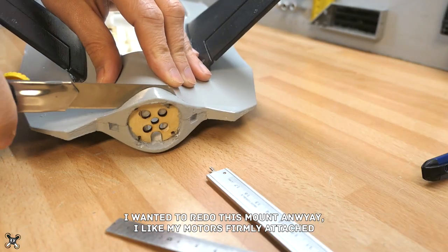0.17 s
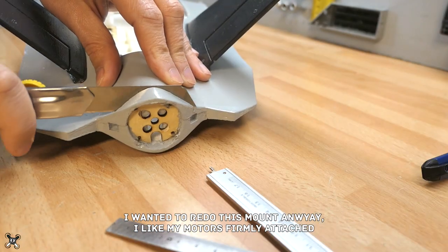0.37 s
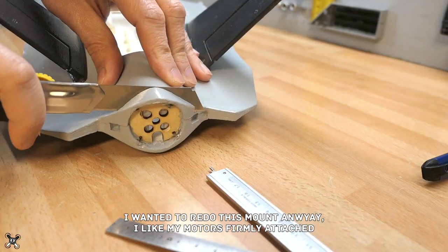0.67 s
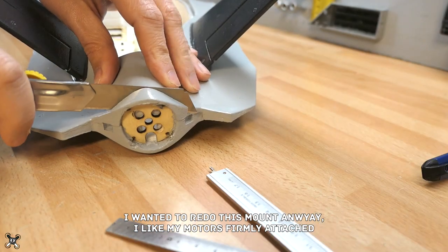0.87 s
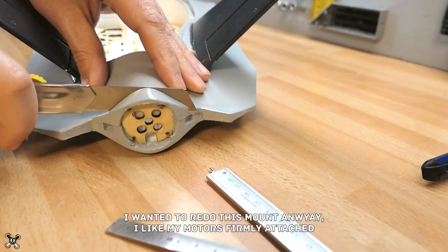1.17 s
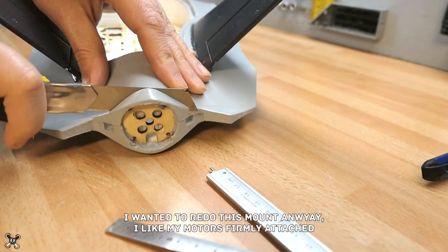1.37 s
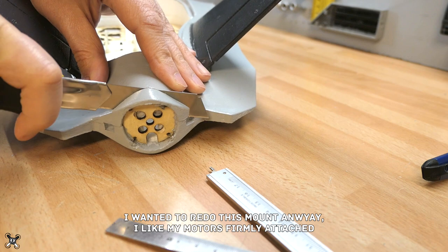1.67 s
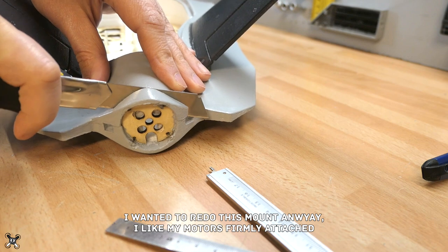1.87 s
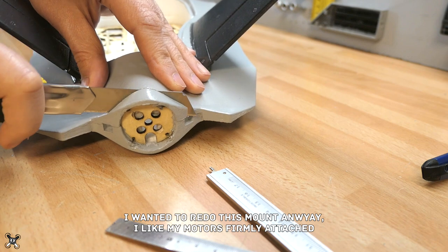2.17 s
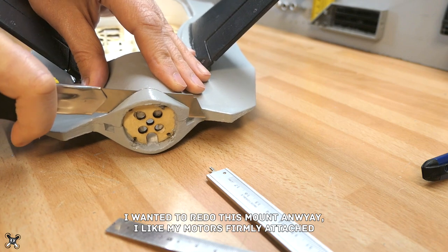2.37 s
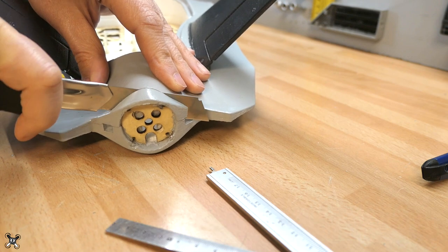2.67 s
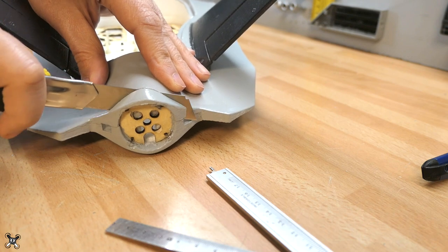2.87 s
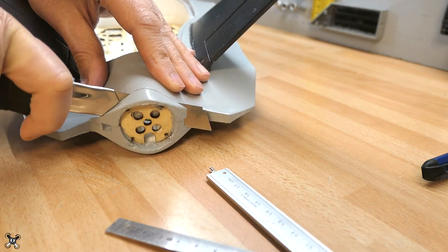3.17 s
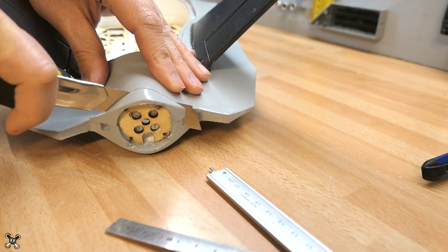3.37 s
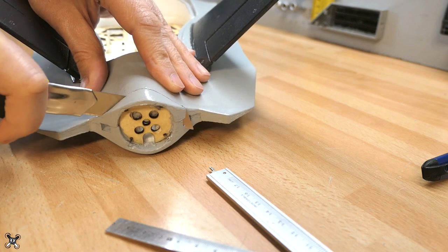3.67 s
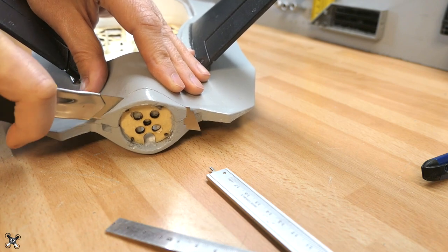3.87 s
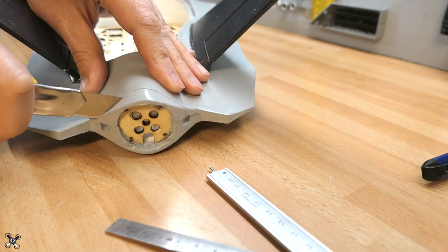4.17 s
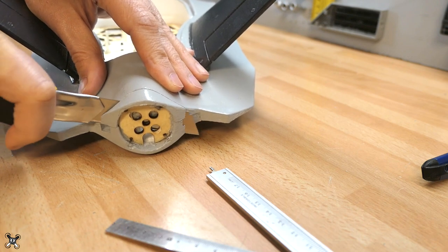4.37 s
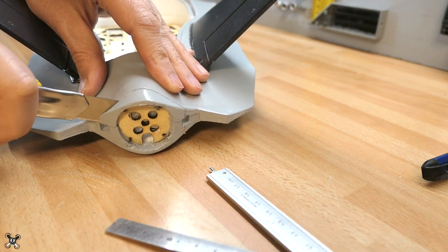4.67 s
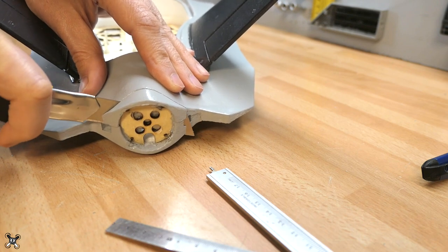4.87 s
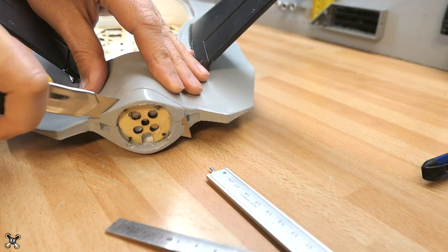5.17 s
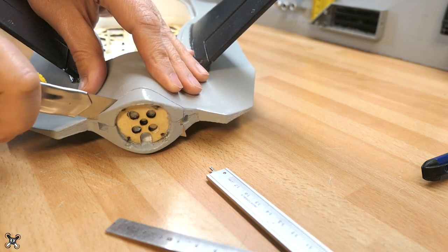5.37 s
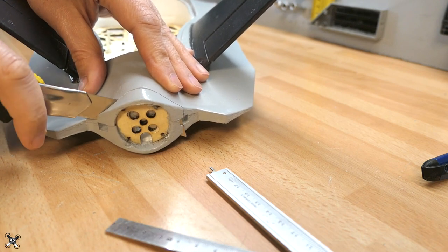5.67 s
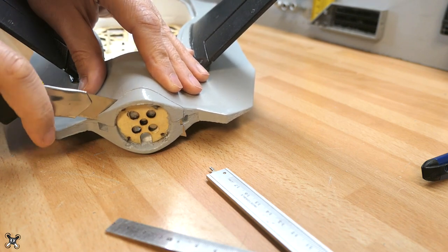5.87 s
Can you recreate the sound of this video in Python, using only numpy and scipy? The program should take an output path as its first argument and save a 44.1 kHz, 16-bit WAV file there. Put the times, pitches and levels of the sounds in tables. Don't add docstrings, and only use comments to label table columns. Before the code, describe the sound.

In a small workshop, a thin knife blade saws through a painted foam shell in short uneven strokes. Foam tears with a grainy hiss and a faint metallic ring, while the shell drags and knocks hollowly on the wooden bench. Brittle paint and glue snaps come mostly early, then stronger rasping bites after three seconds. Close stereo microphones catch short room reflections and quiet steady hiss.

```python
import sys
import numpy as np
from scipy import signal
from scipy.fft import rfft, irfft
from scipy.io import wavfile
from scipy.ndimage import uniform_filter1d

SR = 44100
rng = np.random.default_rng(int(sys.argv[2]) if len(sys.argv) > 2 else 0)


def unload_audio(sound):
    columns = np.transpose(np.atleast_2d(sound))
    steps = np.round(np.clip(columns, -1, 1) * 32767)
    wavfile.write(sys.argv[1], SR, steps.astype(np.int16))


def voltage_ratio(decibels):
    exponent = np.asarray(decibels, float) / 20
    return 10 ** exponent


N = 265482
SPLIT_HZ = 6000


def rms_one(x):
    return x / np.sqrt(np.mean(x ** 2) + 1e-20)


def butter(x, hz, kind, order):
    return signal.sosfilt(signal.butter(order, hz, kind, fs=SR, output="sos"), x)


def at_hz(points, hz):
    table = np.array([p for p in points if p[0] > 0])
    return np.interp(np.log(hz + 1), np.log(table[:, 0]), table[:, 1])


def colour(x, spectrum):
    size = 4096
    level_db = at_hz(spectrum, np.arange(size // 2 + 1) * SR / size)
    cepstrum = irfft(np.log(voltage_ratio(level_db)))
    cepstrum[1:size // 2] *= 2
    cepstrum[size // 2 + 1:] = 0
    response = irfft(np.exp(rfft(cepstrum)))
    return signal.fftconvolve(x, response)[:N]


def drift(rate_hz):
    r = np.exp(-2 * np.pi * rate_hz / SR)
    slow = signal.lfilter([1], [1, -2 * r, r * r], rng.standard_normal(N + SR))
    return rms_one(slow[SR:])


def resonate(x, peaks):
    out = 0
    for k, (hz, width_hz, level_db) in enumerate(peaks):
        r = np.exp(-np.pi * width_hz / SR)
        b = (1 - r * r) / 2 * np.array([1, 0, -1])
        a = [1, -2 * r * np.cos(2 * np.pi * hz / SR), r * r]
        out = out + (-1) ** k * voltage_ratio(level_db) * signal.lfilter(b, a, x)
    return out


def grains(per_s, spread_db, clump_db):
    sizes = voltage_ratio(spread_db * np.minimum(rng.exponential(1, N), 5)) * rng.choice([-1, 1], N)
    slips = rng.random(N) < per_s / SR
    return rms_one(sizes * slips * voltage_ratio(clump_db * drift(29.0)))


def burst(lengths_s, rise_s):
    t = np.arange(round(.04 * SR)) / SR
    shape = (1 - np.exp(-t / rise_s)) * np.exp(-t / np.clip(lengths_s, 3e-4, .012)[:, None])
    pulse = shape * rng.standard_normal((len(lengths_s), len(t)))
    return pulse / np.linalg.norm(pulse, axis=1, keepdims=True)


def place(times, pulses):
    out = np.full(N + pulses.shape[1], 1e-18)
    for s, pulse in zip(times, pulses):
        i = int(np.clip(round(s * SR), 0, N))
        out[i:i + len(pulse)] += pulse
    return out[:N]


def room_tone():
    # (frequency [Hz], density [dB per Hz])
    hiss_colour = [(15, -10), (25, -25.5), (153, -6.5), (223, -7), (476, -5.5), (659, -6.5), (714, -6),
                   (1070, -7.5), (1700, -10.5), (9840, -20.5), (14800, -32.5), (16000, -100)]
    # (frequency [Hz], difference [dB])
    side_colour = [(60, 4), (110, 5.5), (200, 14), (380, 11.5), (700, 8.5), (1290, 3), (2380, 0.5),
                   (4400, -5.5), (8120, -7), (15000, 0)]
    mid, side = (butter(colour(rng.standard_normal(N), hiss_colour), 14300, "low", order=8) for _ in range(2))
    scale = voltage_ratio(-58) / np.std(mid)
    return scale * mid, scale * colour(side, side_colour)


def snaps():
    # (time [s], peak [dB], treble lift [dB])
    snap_events = [(.002, -16, -26), (0.0411, -18, -7), (0.331, -29, -10), (0.6774, -29.5, 1),
                   (.8485, -19, -20), (0.856, -12.5, -25), (.957, -12.5, 2.5), (1.064, -34, 6),
                   (1.1357, -10, -3.5), (1.305, -26.5, -14), (1.6263, -29, 4), (2.15, -35.5, 14),
                   (2.249, -36, 10), (2.5215, -35.5, 26.5), (2.677, -27.5, -30), (2.984, -34, -5),
                   (3.093, -27, 21), (3.543, -34, 12), (3.586, -36, 12), (3.892, -25, -20),
                   (4.001, -26.5, 9), (4.375, -21.5, 4.5), (4.5176, -20.5, 16.5), (4.519, -22, 15),
                   (4.757, -20.5, 1.5), (5.1138, -23.5, -5), (5.238, -17, -3), (5.413, -33, -5),
                   (5.4872, -28.5, -1), (5.5252, -18.5, -25)]
    # (frequency [Hz], density [dB per Hz])
    crack_colour = [(880, -27), (1500, 0), (2420, -0.5), (3800, 4), (6190, -0.5), (7870, -2), (12800, -6.5),
                    (16300, -20.5)]
    crumble_s, treble_fade_s = 0.004, .0012
    s, peak_db, lift_db = np.transpose(snap_events)
    length = np.full(len(s), crumble_s)
    pulses = burst(length, rise_s=0.001)
    pulses[:, 0] = voltage_ratio(-7 + .35 * (peak_db + 22))
    strength = voltage_ratio(peak_db - 16.5) * np.sqrt(np.clip(length, 3e-4, .012) * SR)
    pulses = pulses * strength[:, None]
    fade = np.exp(-np.arange(pulses.shape[1]) / SR / treble_fade_s)
    bright_pulses = pulses * voltage_ratio(lift_db + 0.5)[:, None] * fade
    dull = butter(place(s, pulses), SPLIT_HZ, "low", order=1)
    sharp = butter(place(s, bright_pulses), SPLIT_HZ, "high", order=1)
    click = np.eye(1, N)[0]
    return colour(dull + sharp, crack_colour) / np.linalg.norm(colour(click, crack_colour))


def effort(per_bite, swell_share, edge=1):
    # (start [s], length [s], tearing [dB], swell over the stroke [dB], bite [dB])
    eased = [(.132, 0.13, -47, 7, -6), (.314, 0.13, -48, 8, 2.5), (.448, .183, -55.5, -4, -5.5),
             (.703, 0.15, -45.5, -1.5, -4), (1.442, 0.27, -57.5, -24, -7), (1.575, .13, -51.5, 20, -3),
             (1.94, 0.13, -47.5, -5.5, 3.5), (2.129, .06, -53.5, 6, -1.5), (2.257, 0.29, -54, -18.5, -0.5),
             (2.429, 0.084, -48, 17.5, 0), (2.65, 0.2, -50, 11, 1), (2.957, 0.022, -48.5, 7, 3.5),
             (3.318, 0.18, -47, 4, 7.5), (3.546, 0.12, -51.5, -13, 3), (3.615, 0.18, -42, 5.5, 3),
             (4.21, 0.22, -43.5, 0, 4.5), (4.688, 0.25, -49.5, -6.5, 2.5), (4.92, 0.081, -41.5, 8.5, 6.5),
             (5.155, .11, -41, -5.5, 4.5)]
    # (start [s], length [s], tearing [dB], swell [dB], bite [dB])
    jerked = [(.005, .14, -45.5, -10, -9.5), (.858, 0.11, -55, -10, -13), (.962, 0.16, -57, -20, -9),
              (1.14, 0.14, -57.5, -23, -9), (1.306, 0.041, -61, -14, -10), (3.048, 0.048, -45, 11, 4.5),
              (3.09, 0.11, -37.5, -3.5, 4.5), (3.895, 0.058, -64, -5, -22), (4.002, 0.11, -45, 3.5, 7.5),
              (4.52, 0.13, -46, -4.5, 7), (5.114, 0.04, -49, -10, -7), (5.528, 0.13, -64, -24, -14)]
    ease_s, jerk_s, release_s = 0.026, .004, 0.037
    t, power = np.arange(0, N + 32, 32) / SR, 0
    for rows, attack_s in ((eased, ease_s), (jerked, jerk_s)):
        for s, length, tear_db, swell_db, bite_db in rows:
            fade_in = 1 + np.tanh((t - s) / attack_s)
            fade_out = 1 + np.tanh((s + length - t) / release_s)
            gate = fade_in * fade_out / 4
            along = np.clip((t - s) / length - .5, -.5, .5)
            level_db = tear_db + swell_share * swell_db * along + per_bite * bite_db
            power = power + (gate ** edge * voltage_ratio(level_db)) ** 2
    return np.interp(np.arange(N) / SR, t, np.sqrt(power))


def sawing():
    # (frequency [Hz], density [dB per Hz])
    tear_colour = [(940, -17.5), (1600, -1.5), (1780, -2.5), (1930, -2), (2210, -3.5), (2750, -2),
                   (3450, -2.5), (5590, -5), (6440, -4.5), (15400, -17)]
    # (frequency [Hz], width [Hz], level [dB])
    blade_peaks = [(3400, 150, -8), (4180, 96, -8), (4620, 70, -6), (6050, 350, -3), (6450, 150, -5),
                   (7050, 80, -8), (7740, 150, -12)]
    # (frequency [Hz], width [Hz], level [dB])
    rub_peaks = [(1485, 45, 6), (1650, 120, -10), (1890, 70, -5), (2080, 150, -9)]
    # (frequency [Hz], width [Hz], level [dB])
    drag_peaks = [(167, 18, -6), (270, 93, -2), (346, 58, 2.5), (437, 58, 1.5), (586, 47, 2.5),
                  (783, 58, -1.5), (914, 38, 5), (1157, 200, 1)]
    # (centre [s], tearing [dB], half length [s], body against the hiss [dB])
    lurch_events = [(.006, -57, 0.012, 23.5), (0.042, -45, 0.0062, 13.5), (0.805, -66, 0.021, 16),
                    (.85, -56, 0.0034, 2), (1.71, -67, 0.011, 17), (2.085, -72, 0.017, 25),
                    (3.151, -39, 0.021, 5), (3.185, -37, 0.0088, -7), (3.266, -61, 0.032, 7.5),
                    (3.642, -40.5, 0.021, -0.5), (4.123, -45.5, 0.0069, 0), (4.387, -37, 0.027, -6.5),
                    (4.582, -45, 0.025, -11), (4.679, -27.5, 0.017, -13.5), (4.755, -48, 0.018, -7)]
    # (time [s], level [dB])
    grip = [(0, -11), (.4, 4.5), (.8, -7), (1.5, 3.5), (1.72, -2), (2.0, 0), (2.3, 1.5), (2.52, 9),
            (2.8, -0.5), (3.15, 1.5), (3.42, 3.5), (3.75, 0.5), (4.07, -3), (4.35, 0.5), (4.6, 0.5),
            (4.85, 7.5), (4.98, 6), (5.2, -7)]
    body_hz = 3200
    t = np.arange(N) / SR
    humps = np.array([voltage_ratio(db) * np.exp(-np.abs((t - at) / half) ** 3) for at, db, half, _ in lurch_events])

    cells = grains(per_s=7000., spread_db=2.6, clump_db=1.7)
    ringing = sum(resonate(cells, [peak]) for peak in blade_peaks)
    tear = rms_one(butter(colour(cells + voltage_ratio(-2.0) * ringing, tear_colour), 15300, "low", order=24))
    coarse = butter(tear, SPLIT_HZ, "low", order=1)
    body = butter(tear, body_hz, "low", order=2)
    rub = rms_one(resonate(grains(per_s=4000., spread_db=1.0, clump_db=1.5), rub_peaks))
    drag = rms_one(resonate(grains(per_s=1300.0, spread_db=-2.5, clump_db=1.5), drag_peaks))

    hiss = effort(1, 1.45, edge=1.22) * voltage_ratio(0.63 * drift(3.0)) * (tear - coarse)
    cut = effort(0, 0.9) * coarse + hiss
    lurch_hiss = humps.sum(0) * butter(tear, body_hz, "high", order=2)
    lurch_body = voltage_ratio(np.array(lurch_events)[:, 3]) @ humps * (body + voltage_ratio(-10.5) * drag + voltage_ratio(-9) * rub)
    grip_db = np.interp(t, *np.transpose(grip))
    flanks = voltage_ratio(-9.5 + grip_db + 2.0 * drift(30.0)) * effort(-0.033, 1.0) * rub
    dragging = voltage_ratio(-5) * effort(-0.51, 0.51, edge=0.56) * drag
    return cut + lurch_hiss + lurch_body + flanks + dragging


def struck(times, peak_db, lengths_s, modes, scatter_db):
    out = 0
    for hz, level_db, t60 in modes:
        r, w = voltage_ratio(-60 / (t60 * SR)), 2 * np.pi * hz / SR
        pulses = burst(np.clip(lengths_s, .001, .005), rise_s=.12 / hz)
        tuned = np.abs(pulses @ np.exp(1j * w * np.arange(pulses.shape[1])))
        gain = voltage_ratio(peak_db + level_db + scatter_db * rng.standard_normal(len(times))) / (tuned + 0.17)
        force = resonate(place(times, pulses * gain[:, None]), [(hz, 1.7 * hz, 0)])
        out = out + signal.lfilter([0, np.sin(w)], [1, -2 * r * np.cos(w), r * r], force)
    return out


def knocks():
    # (time [s], peak [dB], bench thump against peak [dB])
    rap_events = [(.04, -27.5, -16), (0.68, -41.5, -20), (0.856, -33, -8.5), (0.96, -22, -22.5),
                  (1.068, -40.5, -12), (1.136, -30, -9.5), (2.666, -33.5, -8), (2.675, -27.5, -41),
                  (2.972, -53, -12), (3.104, -32, -16), (3.347, -32.5, -17), (3.652, -32.5, -9),
                  (3.894, -34.5, -10), (3.984, -33, -21), (4.377, -50, -5.5), (4.523, -31.5, -16),
                  (5.143, -40.5, -1), (5.238, -30.5, -8.5), (5.49, -41, -5), (5.527, -33.5, -7.5),
                  (5.664, -47.5, -2.5)]
    # (time [s], peak [dB], bench thump against peak [dB])
    bump_events = [(.006, -34, -27), (.328, -27.5, -15), (.737, -24, -13), (0.924, -37.5, -4.5),
                   (1.118, -34, -11.5), (1.167, -28, -11), (1.231, -30, -9), (1.306, -27.5, -16),
                   (1.317, -30, -11), (1.622, -40, -18), (1.816, -52, -1), (1.876, -36, -8.5),
                   (2.639, -42.5, -10), (3.05, -35, -11.5), (3.565, -35.5, -10), (3.937, -31.5, -12),
                   (4.001, -23, -14), (4.201, -43, -6.5), (5.039, -32.5, -12), (5.376, -38.5, -10),
                   (5.591, -37.5, -8.5)]
    # (frequency [Hz], level [dB], time to fall 60 dB [s])
    shell_modes = [(746, -10, 0.062), (923, -1, 0.039), (981, -7, 0.085), (1147, -7.5, 0.028)]
    # (frequency [Hz], level [dB], time to fall 60 dB [s])
    bench_modes = [(76, -6.5, 0.078), (122, -17, 0.16), (156, -2, 0.053), (190.3, -4.5, 0.15),
                   (255.7, 3.5, 0.07), (313, -1.5, 0.13), (400, 6.5, 0.024), (438, -5, 0.14),
                   (546, 3.5, 0.033)]
    # (frequency [Hz], level [dB], time to fall 60 dB [s])
    rim_modes = [(1320, -4, .04), (1460, 0, .06), (1640, -5, .04), (1900, -3, .04), (2150, -5, .025),
                 (2400, -8, .012), (2800, -10, .01)]
    s, peak_db, thump_db = np.transpose(rap_events + bump_events)
    is_rap = np.arange(len(s)) < len(rap_events)
    rim_db = np.where(is_rap, 0.5, -7.5)
    length = np.where(is_rap, .002, .0025)
    shell = struck(s, peak_db - 2.5, length, shell_modes, scatter_db=2.5)
    bench = struck(s + 0.0014, peak_db + thump_db - 0.5, 0.62 * length, bench_modes, scatter_db=-1.0)
    rim = struck(s, peak_db + rim_db - 12, .6 * length, rim_modes, scatter_db=2)
    return shell + bench + rim


def workshop(x, strength, gap_s):
    # (frequency [Hz], time to fall 60 dB [s])
    room_t60 = [(150, 0.49), (500, 0.16), (2000, 0.096), (6000, 0.14), (14000, 0.017)]
    t = np.arange(round(.5 * SR)) / SR
    tail = 0
    for low in 50 * 2. ** np.arange(9):
        octave = signal.butter(2, [low, min(2 * low, .45 * SR)], "band", fs=SR, output="sos")
        band = signal.sosfilt(octave, rng.standard_normal(len(t)))
        t60 = np.clip(at_hz(room_t60, low * np.sqrt(2)), .05, 2)
        decay = voltage_ratio(-60 * t / t60) * (t > gap_s)
        tail = tail + band * decay / np.linalg.norm(decay)
    response = rfft(tail)
    response /= np.sqrt(uniform_filter1d(np.abs(response) ** 2, size=30))
    return colour(signal.fftconvolve(x, irfft(response))[:N], strength)


def scene():
    # (frequency [Hz], level against direct sound [dB])
    room_mid = [(100, -2), (500, -10.5), (2000, -7), (8000, -11), (15000, -4)]
    # (frequency [Hz], level against direct sound [dB])
    room_side = [(60, 2), (250, -3), (500, -10), (1000, -9.5), (4000, -8.5), (8000, -10), (14000, -3.5)]
    left_db = -.3
    work = butter(sawing() + knocks() + snaps(), 102.5, "high", order=3)
    hiss_mid, hiss_side = room_tone()
    mid = work + workshop(work, room_mid, gap_s=0.0043) + hiss_mid
    side = workshop(work, room_side, gap_s=0.00096) + hiss_side
    return np.array([voltage_ratio(left_db / 2) * (mid + side), voltage_ratio(-left_db / 2) * (mid - side)])


def low_pass(x):
    return signal.sosfilt(signal.butter(12, 16660, fs=SR, output="sos"), x)


def record(dry):
    mix = butter(dry, 16300, "low", order=30)
    return low_pass(mix)


dry = scene()
out = record(dry)
unload_audio(out)
```